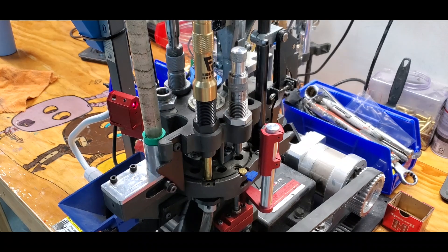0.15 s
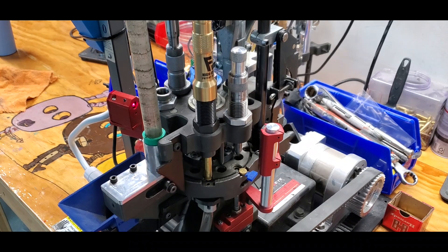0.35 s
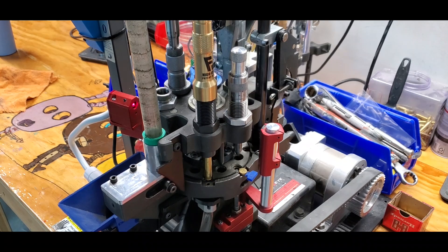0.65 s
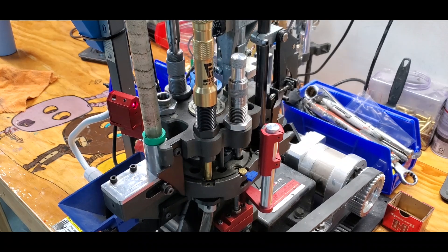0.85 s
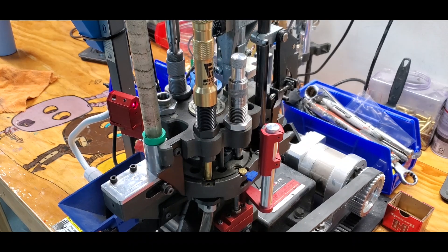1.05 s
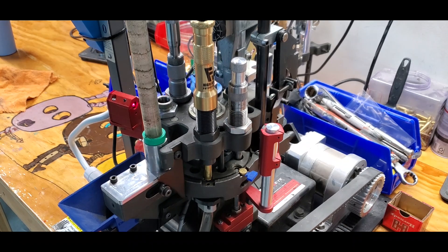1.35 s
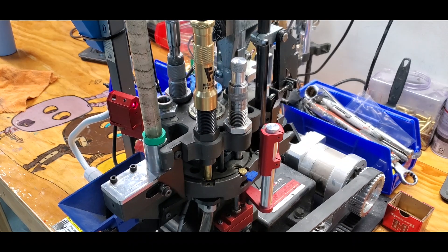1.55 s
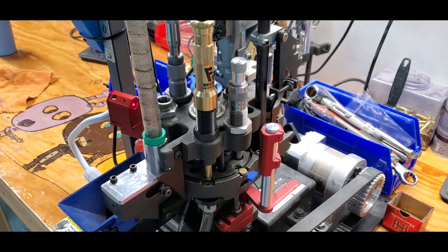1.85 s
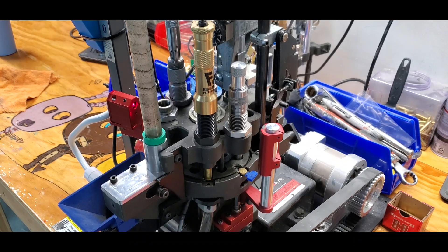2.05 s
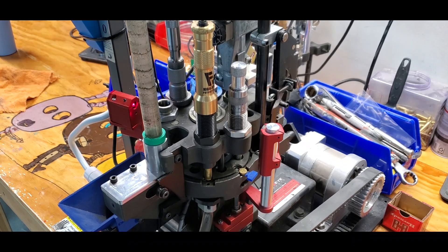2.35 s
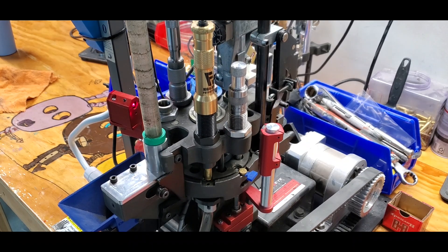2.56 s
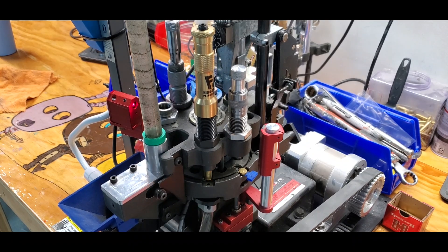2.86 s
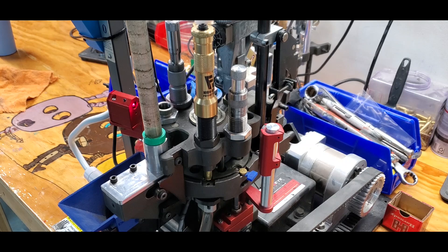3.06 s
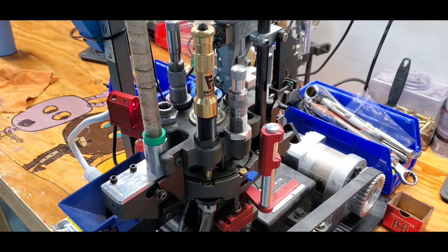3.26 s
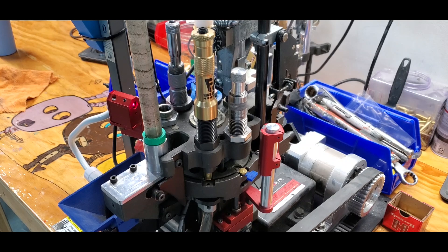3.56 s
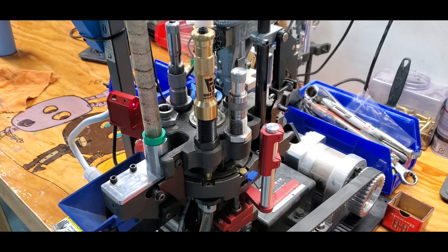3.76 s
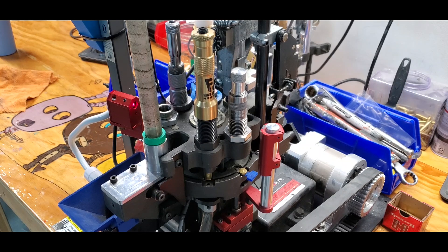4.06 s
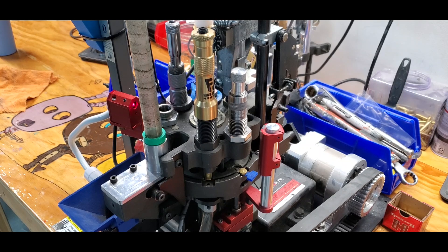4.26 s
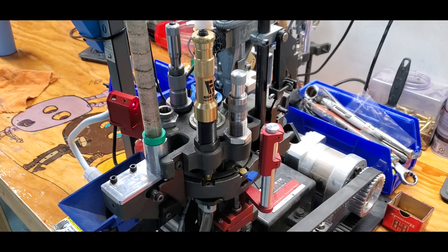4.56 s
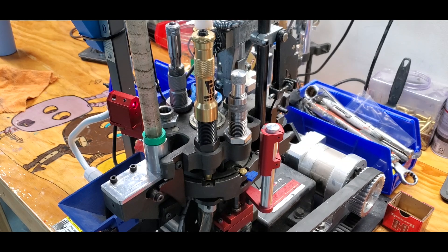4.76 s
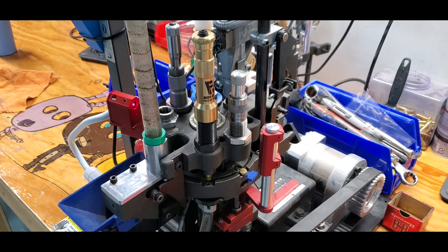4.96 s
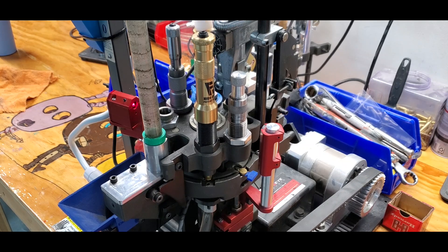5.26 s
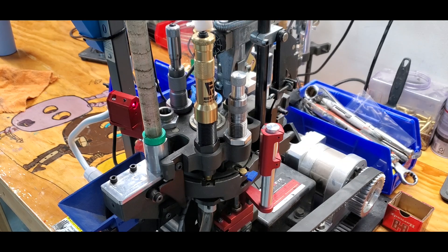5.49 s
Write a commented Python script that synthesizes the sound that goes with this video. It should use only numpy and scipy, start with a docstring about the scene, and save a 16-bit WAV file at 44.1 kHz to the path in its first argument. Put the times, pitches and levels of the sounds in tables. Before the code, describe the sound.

Close stereo capture of a motorised reloading press on a wooden workshop bench. Short rattling steps bring hard clacks and bench thuds about every half to one second, sharpest near 1.3 seconds, then softer after three. Brass cases rub and slide in a ringing metal bowl throughout, with small ticks of loose parts, low motor rumble, faint hiss and short room echoes.

```python
"""A motor-driven reloading press is stepped through its stroke on a wooden bench in a small workshop.
From the start the linkage rattles and knocks in short steps: noise bursts, and ringing steel and bench.
Under it, brass cases rub a ringing feeder bowl and the motor rumbles, both as shaped noise, over faint hiss.
Loose parts soon tick as short tones with a spit of hiss; cases also slide in runs, and later come dull taps.
Echoes of the press, taps and ticks, made by feedback delays, give the sound of the shop."""
import sys
import numpy as np
from scipy import signal
from scipy.fft import rfft, irfft
from scipy.io import wavfile

SR = 44100
rng = np.random.default_rng(int(sys.argv[2]) if len(sys.argv) > 2 else 0)


def waveform_to_disk(signal):
    """Save audio, clipped to [-1, 1], as 16-bit WAV at the path in sys.argv[1]."""
    frames = np.transpose(np.atleast_2d(signal))
    scaled = np.clip(frames, -1, 1) * 32767
    samples = np.round(scaled).astype(np.int16)
    wavfile.write(sys.argv[1], SR, samples)


N = 248106   # length in samples

# A t60 is the time a sound takes to fall by 60 dB. Mode and spectrum levels are relative.
# ringing tones of the steel frame: (f/Hz, level/dB)
FRAME = [(1685, 2.5), (2363, -3.5), (4410, 1.5), (4970, -1.5), (6170, -3), (12750, -18)]
FRAME_T60_S = 0.04
# ringing tones of the bench: (f/Hz, level/dB, t60/s)
BENCH = [(172, 11.5, 0.016), (239.5, -3, 0.14), (284, -3.5, 0.12), (354.8, 3, 0.082), (449, -0.5, 0.051),
         (123.6, -5.5, 0.1)]
# the whole bench swaying, low then high: (f/Hz, t60/s)
SWAY = [(60, 0.215), (97, 0.16)]
# jingling tones of the loose parts: (f/Hz, level/dB)
JINGLE = [(6400, 0), (9400, 9), (11400, 3)]


def amp(db):
    """Turn decibels into a gain."""
    return 10 ** (np.asarray(db) / 20)


def rms_one(x):
    """Scale to an average strength (rms) of 1."""
    return x / np.sqrt(np.mean(np.square(x)) + 1e-20)


def at_hz(points, hz):
    """Read a spectrum between its points, on a log-frequency axis."""
    p = np.array(points)
    return np.interp(np.log(hz), np.log(np.maximum(p[:, 0], 1)), p[:, 1])


def drift(rate):
    """Slow random wander with a spread of 1: noise smoothed twice by a low-pass at rate Hz."""
    step = 40   # one slow value per 40 samples is enough
    r = np.exp(-2 * np.pi * rate * step / SR)
    white = rng.standard_normal(N // step + 2002)
    slow = signal.lfilter([1], [1, -2 * r, r * r], white)[2000:]   # drop the settling time
    return np.interp(np.arange(N) / step, np.arange(len(slow)), rms_one(slow))


def ring(x, hz, t60):
    """A resonance: a click of size 1 sets a dying sine of height 1 ringing."""
    r = amp(-60 / (t60 * SR))
    w = 2 * np.pi * hz / SR
    return signal.lfilter([0, np.sin(w)], [1, -2 * r * np.cos(w), r * r], x + 1e-18)


def band_filter(x, low_hz, high_hz):
    """Keep only what lies between two frequencies."""
    return signal.sosfilt(signal.butter(2, [low_hz, high_hz], "band", fs=SR, output="sos"), x)


def noise(spectrum):
    """Stereo noise of rms 1, coloured by a spectrum and silent outside it; wider in the treble."""
    # stereo width: (f/Hz, level of side over mid/dB)
    spread = [(60, -12.5), (150, -23.5), (380, -7.5), (950, -0.5), (15000, -0.5)]
    hz = np.maximum(np.arange(N // 2 + 1) * SR / N, 1)
    inside = (hz > spectrum[0][0]) & (hz < spectrum[-1][0])
    mid, side = rfft(rng.standard_normal((2, N))) * amp(at_hz(spectrum, hz)) * inside
    side = side * amp(at_hz(spread, hz))
    return rms_one(irfft(np.array([mid + side, mid - side]), N))


def held(rows, rise_s, edge):
    """Envelope of (t/s, length/s, level/dB) events: rise, hold, fall; a high edge ends abruptly."""
    out = np.zeros(N)
    for s, length, level_db in rows:
        i = round(max(s, 0) * SR)
        t = np.arange(min(N - i, SR // 2)) / SR
        fall = np.exp(-(t / max(length, 0.01)) ** edge)
        out[i:i + len(t)] += amp(level_db) * (1 - np.exp(-t / rise_s)) * fall
    return out


def fading(rows, t60, rise_s):
    """Envelope of (t/s, level/dB) events: a quick rise, an exponential fall, powers added."""
    power = np.zeros(N)
    for s, level_db in rows:
        i = round(s * SR)
        t = np.arange(min(N - i, SR // 2)) / SR
        fall = amp(level_db - 60 * t / max(t60, 0.005))
        power[i:i + len(t)] += (fall * (1 - np.exp(-t / rise_s))) ** 2
    return np.sqrt(power)


def struck(times, levels_db, modes, spread_db):
    """Blows on ringing modes: each strikes every mode with a strength and sign of its own."""
    at = np.round(np.asarray(times) * SR).astype(int)
    out = np.zeros(N)
    luck = rng.standard_normal((len(at), len(modes), 2))
    for k, (hz, level_db, t60) in enumerate(modes):
        clicks = np.zeros(N)
        strength = amp(levels_db + level_db + spread_db * luck[:, k, 0])
        clicks[at] = strength * np.sign(luck[:, k, 1])
        out += ring(clicks, hz, t60)
    return out


def press():
    """Moving steps rattle and shake; knocks add noise bursts and set steel and bench ringing."""
    # motor steps: (t/s, length/s, clank level/dB, treble level/dB, bench level/dB, sway level/dB)
    steps = [(0, 0.15, -44, -53.5, -34.5, -35.5), (0.684, 0.18, -44, -56.5, -34, -34.5),
             (1.224, 0.21, -46, -58, -35.5, -36.5), (1.891, 0.13, -45, -57.5, -34, -25.5),
             (2.737, 0.15, -44, -61, -32.5, -47.5), (3.363, 0.086, -52.5, -71, -36.5, -45),
             (3.441, 0.13, -56.5, -74, -41.5, -34.5), (4.362, 0.11, -59, -85, -41.5, -32),
             (4.443, 0.12, -58, -81, -43, -37), (5.021, 0.14, -54.5, -72.5, -37, -31),
             (5.416, 0.085, -55.5, -75.5, -57, -58.5)]
    # linkage knocks: (t/s, clank level/dB, treble level/dB, bench level/dB,
    #                  low sway level/dB, high sway level/dB)
    knocks = [(0.051, -43, -50, -37, -57, -27.5), (0.105, -56, -48, -55, -34, -26),
              (0.702, -21, -45.5, -45, -44, -53), (0.732, -52, -49.5, -31, -21.5, -57),
              (0.775, -51, -56, -31, -39, -49), (1.243, -28.5, -53, -32, -42.5, -55),
              (1.2698, -34, -21, -25, -36, -31), (1.276, -25, -32, -57, -48, -48),
              (1.288, -45, -56, -28, -28, -20.5), (1.335, -34, -43.5, -29.5, -22, -40),
              (1.896, -23.5, -56, -30.5, -44, -45), (1.914, -42, -43, -38.5, -33, -52),
              (1.997, -32.5, -58, -32, -44, -34.5), (2.746, -21.5, -49, -28.5, -15.5, -54),
              (2.778, -57, -51, -49, -20, -40.5), (2.823, -65, -73, -49.5, -28.5, -36.5),
              (3.37, -49.5, -73.5, -51, -16.5, -51), (4.364, -56, -85, -58.5, -25.5, -41),
              (5.006, -47.5, -85, -41, -41.5, -31), (5.033, -53.5, -58.5, -46, -45.5, -48)]
    # noise colour of the clank: (f/Hz, level per Hz/dB)
    clank_colour = [(200, -30.5), (370, -1), (620, -5.5), (1600, -17), (2400, -22.5), (3100, -31),
                    (5500, -53)]
    # noise colour of the treble: (f/Hz, level per Hz/dB)
    treble_colour = [(1800, -17.5), (2500, -5), (3150, -3), (4300, -3), (5300, -6.5), (6800, -7),
                     (15400, -5.5), (16200, -28.5)]

    start, length, *step_db = np.transpose(steps)
    clank, treble, bench, sway = [held(zip(start, length, db), 0.011, edge=2.3) for db in step_db]
    s, clank_db, treble_db, bench_db, *sway_db = np.transpose(knocks)
    clank = clank + fading(zip(s, clank_db), 0.06, 0.0051)
    bright = fading(zip(s, treble_db), 0.1, 0.0036)

    # the moving linkage and the tail of a knock are duller than its first crack
    dull = rms_one(signal.lfilter(*signal.butter(2, 5200, fs=SR), noise(treble_colour)))
    tail = rms_one(signal.lfilter(*signal.butter(1, 6600, fs=SR), noise(treble_colour)))
    crack = noise(treble_colour) * fading(zip(s, treble_db + 7), 0.014, 0.00057)
    shake = crack + clumped(noise(clank_colour) * clank + dull * treble + tail * bright)
    point = rattle(treble) + bench_shake(bench, sway) + knock_rings(s, treble_db, bench_db, sway_db)
    return shake, point


def clumped(x):
    """Contacts come in uneven clumps: each frequency band flutters in level at its own moments."""
    # edges of the bands, low to high: (f/Hz)
    edges = (150, 1500, 4500, 12000, 16500)
    clump_db, clumps_per_s = 3.5, 70
    out = 0
    for k, (low_hz, high_hz) in enumerate(zip(edges, edges[1:])):
        flutter = amp(clump_db * drift(clumps_per_s))
        out = out + (-1) ** k * flutter * band_filter(x, low_hz, high_hz)   # every other band flipped
    return out


def rattle(envelope):
    """Small uneven contacts at random moments, each ringing one mode of the frame or a loose part."""
    per_s, level_db, uneven_db = 30, -4, 1.5   # contacts per mode; level over the given envelope
    modes = FRAME + JINGLE
    luck = np.minimum(rng.exponential(1, N), 4)
    sizes = amp(level_db + uneven_db * luck) * envelope
    hit = rng.random(N) < per_s * len(modes) / SR
    dealt = rng.integers(0, len(modes), N)   # which mode a contact rings
    out = np.zeros(N)
    for k, (hz, db) in enumerate(modes):
        out += amp(db) * ring(sizes * hit * (dealt == k), hz, FRAME_T60_S / 2)
    return out


def bench_shake(bench, sway):
    """While the linkage moves, random shaking keeps the bench ringing and swaying."""
    shaking = rng.standard_normal(N)
    tones = rms_one(sum(amp(db) * ring(shaking, hz, t60) for hz, db, t60 in BENCH))
    swaying = rms_one(sum(ring(shaking, hz, t60) for hz, t60 in SWAY))
    return bench * tones + sway * swaying


def knock_rings(s, treble_db, bench_db, sway_db):
    """Each knock rings the steel frame, then the bench 4 ms later, and sets the bench swaying."""
    frame_modes = [(hz, db, FRAME_T60_S) for hz, db in FRAME]
    out = struck(s, treble_db - 6, frame_modes, spread_db=2)
    out += struck(s + 0.004, bench_db, BENCH, spread_db=1)
    for level_db, (hz, t60) in zip(sway_db, SWAY):
        out += struck(s, level_db, [(hz, 0, t60)], spread_db=5)
    return out


def bowl_ringing(thin_db):
    """Rubbing noise excites the bowl's resonances, whose pitches waver as its load shifts."""
    # ringing tones of the feeder bowl: (f/Hz, width/Hz, level/dB)
    bowl_modes = [(609.5, 30, 9.5), (687.7, 98, 6.5), (1071.5, 29, -8), (1314, 38, -11.5),
                  (1548, 120, -10.5), (1904, 117, -19.5), (2125, 49, -15.5), (2774, 82, -22),
                  (3896, 330, -34.5)]
    waver = 0.006   # spread of the waver as a share of the pitch
    rub = noise([(200, 0), (8000, 0)])
    extra = [0] * (len(bowl_modes) - len(thin_db)) + thin_db   # only the highest modes change level
    out = 0
    for (hz, width, level_db), extra_db in zip(bowl_modes, extra):
        t60 = np.log(1000) / (np.pi * width)
        sharp = rms_one(ring(ring(rub, hz, t60), hz, t60))   # twice through: dark valleys
        out = out + amp(level_db + extra_db) * np.sqrt(width) * sharp
    clock = np.cumsum(1 + waver * drift(6))   # reading at an uneven speed bends the pitch
    clock *= (N - 1) / clock[-1]
    return rms_one([np.interp(clock, np.arange(N), channel) for channel in out])


def feeder(shuffle_db, thin_db):
    """Cases rub the bowl steadily and in slides; slides ring it more clearly."""
    # noise between the bowl's tones: (f/Hz, level per Hz/dB)
    between_colour = [(250, -15), (450, -4), (610, -7.5), (930, -9.5), (2200, -30.5), (2550, -41),
                      (5000, -66.5)]
    # cases sliding in runs: (t/s, length/s, level below the split/dB, level above it/dB)
    slides = [(0.2, 0.06, -47.5, -39.5), (0.263, 0.14, -53, -42.5), (0.417, 0.145, -48.5, -40),
              (0.603, 0.19, -51, -40.5), (1.025, 0.47, -53, -45.5), (1.529, 0.12, -57.5, -49.5),
              (1.704, 0.35, -47.5, -41.5), (2.152, 0.18, -50, -43.5), (2.408, 0.17, -53.5, -40),
              (2.614, 0.22, -51.5, -47), (2.937, 0.09, -48.5, -48), (3.076, 0.19, -58, -58.5),
              (3.26, 0.32, -58, -43.5), (3.576, 0.22, -51.5, -44.5), (3.864, 0.093, -53.5, -51),
              (3.941, 0.095, -51, -47), (4.172, 0.088, -52, -53), (4.327, 0.23, -63.5, -40.5),
              (4.958, 0.12, -63.5, -40.5), (5.582, 0.14, -61.5, -37.5)]
    split_hz = 1026
    throb = amp(3.0 * drift(22))   # the upper part of a run throbs as cases catch and slip
    grain = amp(1.0 * drift(53))   # a finer flutter over everything in the bowl
    tones, between = bowl_ringing(thin_db), noise(between_colour)
    out = amp(shuffle_db) * rms_one(tones + amp(2) * between)
    clear = rms_one(tones + amp(-9) * between)
    s, length, low_db, high_db = np.transpose(slides)
    for side, level_db, catch in (("low", low_db, 1), ("high", high_db, throb)):
        force = catch * held(zip(s, length, level_db), 0.0022, edge=8.3)
        part = signal.sosfilt(signal.butter(4, split_hz, side, fs=SR, output="sos"), clear)
        out = out + force * part
    return out * grain


def motor(level_db):
    """Rumble through the bench, with a wavering hum near the bench's sway."""
    # noise colour of the rumble: (f/Hz, level per Hz/dB)
    rumble_colour = [(25, -17), (49, -9.5), (102, -3), (139, -11.5), (172, -8), (600, -29.5), (780, -28.5)]
    hum = rms_one(ring(rng.standard_normal(N), 60, 0.85))   # noise through a 60 Hz resonance
    return amp(level_db) * (noise(rumble_colour) + amp(-1.5) * hum)


def faint_hiss():
    """A faint steady hiss: coloured noise."""
    # noise colour of the hiss: (f/Hz, level per Hz/dB)
    hiss_colour = [(1470, -34), (2500, -3.5), (7250, -16.5), (11900, -15.5), (16000, -33.5)]
    return amp(-81) * noise(hiss_colour)


def ticks():
    """Loose parts tick: a short mode rings and spits hiss round its pitch; high ones also jingle."""
    # loose parts ticking: (t/s, level/dB, f/Hz)
    tick_rows = [(0.018, -51.5, 10700), (0.792, -51, 10700), (0.828, -49, 3730), (0.8555, -58, 6300),
                 (0.922, -62, 10640), (0.973, -65, 10100), (1.519, -51, 2930), (1.921, -45, 1830),
                 (1.934, -45, 4150), (1.985, -39.5, 3420), (2.87, -70, 6700), (3.386, -57, 10100),
                 (3.395, -62, 7700), (3.462, -61, 9700), (3.492, -63.5, 9400), (4.4565, -66.5, 9500),
                 (5.036, -51.5, 5930), (5.12, -61, 9700)]
    ring_t60_s, spit_db, spit_t60_s = 0.046, -3, 0.059   # spit level is relative to the ring
    out, spit = np.zeros(N), np.zeros((2, N))
    white = noise([(200, 0), (16000, 0)])
    jingle = rms_one(sum(amp(db) * ring(white, hz, 0.003) for hz, db in JINGLE))
    for s, level_db, hz in tick_rows:
        out += struck([s], level_db, [(hz, 0, ring_t60_s)], spread_db=2)
        i = round(s * SR)
        span = slice(i, i + SR // 5)
        hiss = rms_one(band_filter(white[:, span], 0.45 * hz, 1.35 * hz))
        if hz > 5200:
            hiss = hiss + jingle[:, span]
        spit[:, span] += hiss * fading([(s, level_db + spit_db)], spit_t60_s, 0.00032)[span]
    return out, spit


def taps():
    """Small dull taps: soft contacts, each a short ring heard only near its own pitch."""
    # small dull taps, level before filtering: (t/s, level/dB, f/Hz)
    tap_rows = [(2.751, -17, 380), (3.388, -45, 820), (4.07, -46, 2162), (4.366, -41, 820),
                (5.018, -43, 840), (5.612, -41, 800)]
    out = np.zeros(N)
    for s, level_db, hz in tap_rows:
        tone = struck([s], level_db, [(hz, 0, 0.03)], spread_db=0)
        out += band_filter(tone, 0.75 * hz, 1.25 * hz)
    return out


def shop(x):
    """Echoes of the shop: eight feedback delays a side, duller and weaker on every round."""
    t60_s, wall_cut_hz = 0.34, 14000
    out = np.zeros((2, N))
    dull = np.exp(-2 * np.pi * wall_cut_hz / SR)
    for k, lag in enumerate((rng.uniform(0.008, 0.03, 16) * SR).astype(int)):
        loop, state = x.copy(), [0.]
        gain = amp(-60 * lag / SR / t60_s)
        for i in range(lag, N, lag):   # one block per round of the delay
            back, state = signal.lfilter([gain * (1 - dull)], [1, -dull], loop[i - lag:i], zi=state)
            loop[i:i + lag] += back[:N - i]
        out[k % 2] += (loop - x) * (-1) ** (k // 2)   # echoes only, with mixed signs
    return out


def scene():
    """Press, feeder, motor, ticks and taps in the shop, over a faint hiss."""
    # background levels: (t/s, case shuffle level/dB, second-highest bowl mode change/dB,
    #                     highest bowl mode change/dB, motor rumble level/dB)
    running = [(.15, -52.5, 1, -3, -41), (1.002, -55.5, -8.5, -4, -44), (1.85, -55, 2, 1, -43.5),
               (2.152, -49.5, -9.5, 1, -43.5), (3.5, -56, -7, -4.5, -43), (4.5, -61.5, -21, -8, -46.5),
               (5.63, -55.5, -26, -4.5, -43.5)]
    s, *columns = np.transpose(running)
    shuffle_db, *thin_db, rumble_db = [np.interp(np.arange(N) / SR, s, c) for c in columns]
    shake, blows = press()
    tick_rings, spit = ticks()
    point = blows + tick_rings + taps()
    right_lag = 7   # samples by which these sounds reach the right channel later
    near = np.array([point, np.roll(point, right_lag)]) + shake + spit
    # only sound above the bass is sent to the echoes
    bright = signal.sosfilt(signal.butter(2, 500, "high", fs=SR, output="sos"), near[0])
    steady = feeder(shuffle_db, thin_db) + motor(rumble_db)
    return near + amp(-17.5) * shop(bright) + steady + faint_hiss()


def record(dry):
    """The left channel is a little weaker; the deepest bass and the top are cut."""
    balanced = dry * amp([[-0.7], [0.7]])
    no_bass = signal.sosfilt(signal.butter(6, 40, "high", fs=SR, output="sos"), balanced)
    return signal.sosfilt(signal.cheby2(16, 70, 16700, fs=SR, output="sos"), no_bass)


dry = scene()
out = record(dry)
waveform_to_disk(out)
```